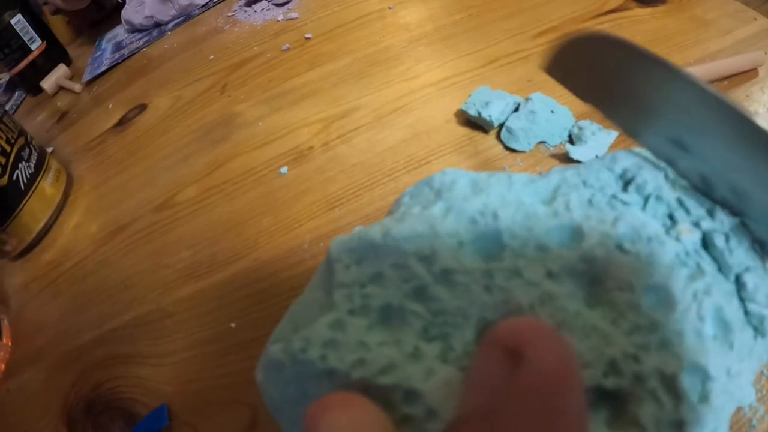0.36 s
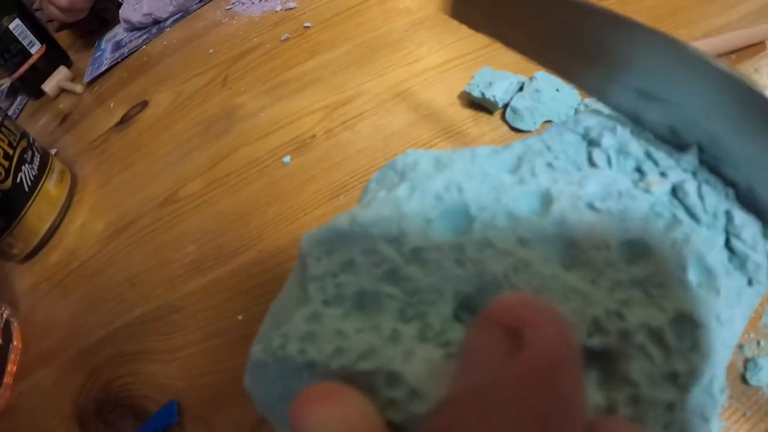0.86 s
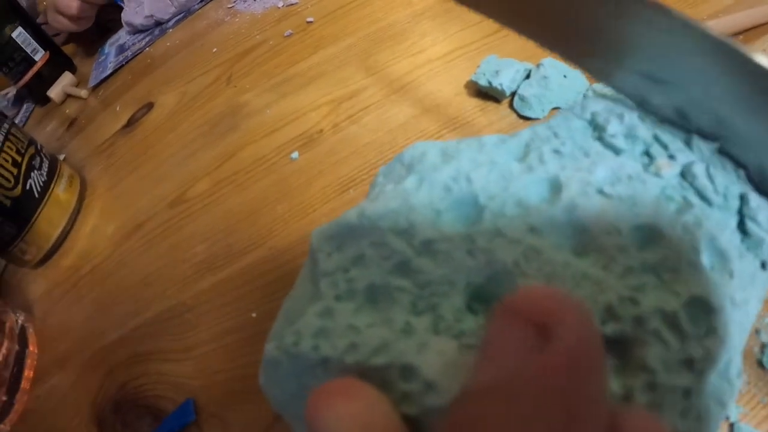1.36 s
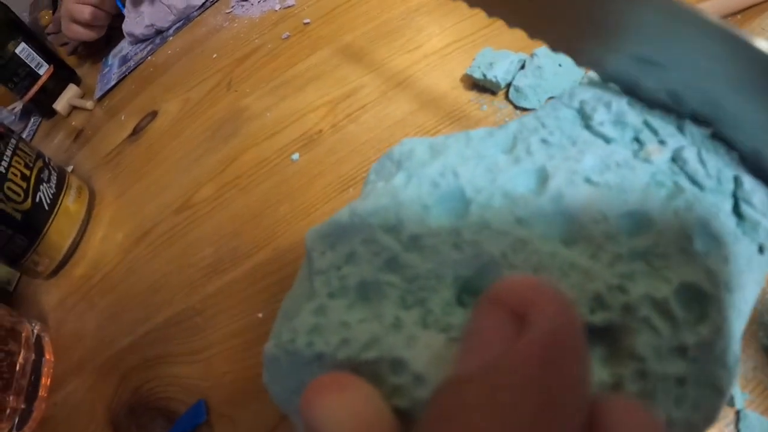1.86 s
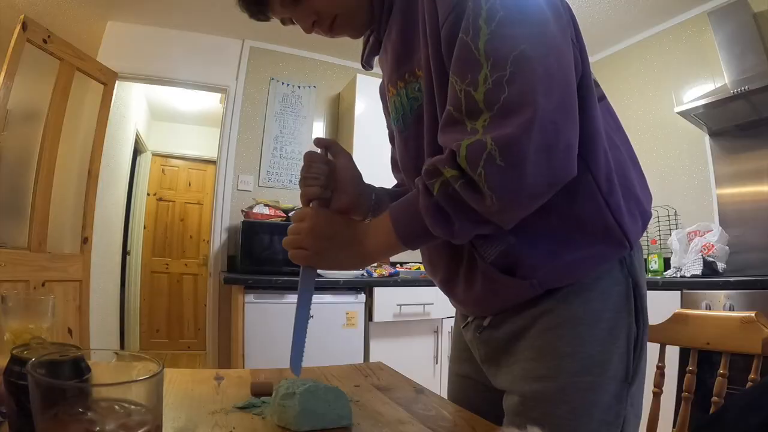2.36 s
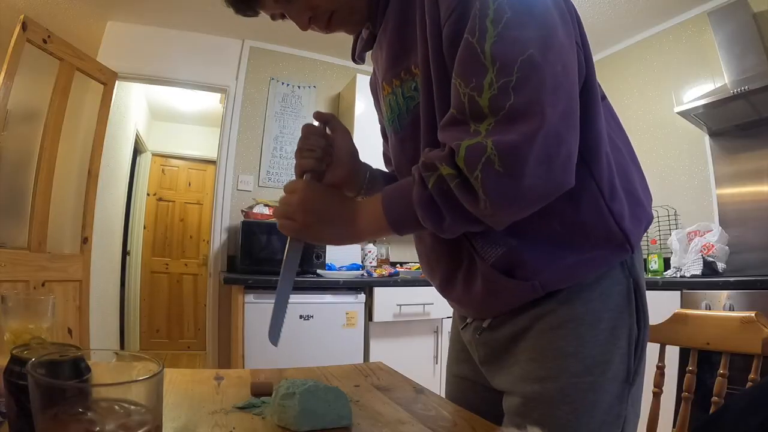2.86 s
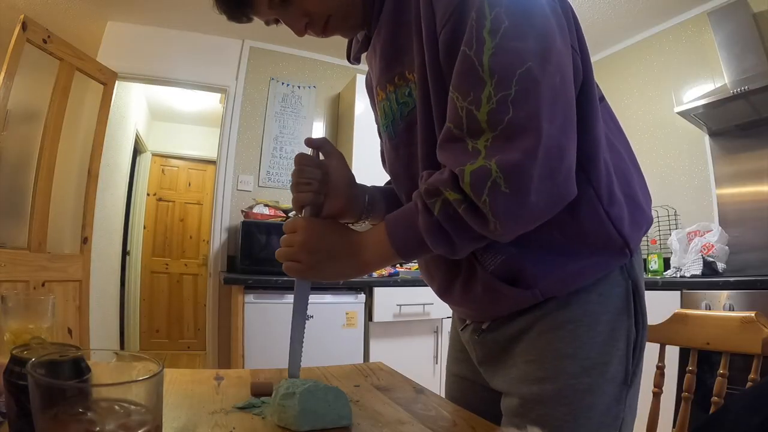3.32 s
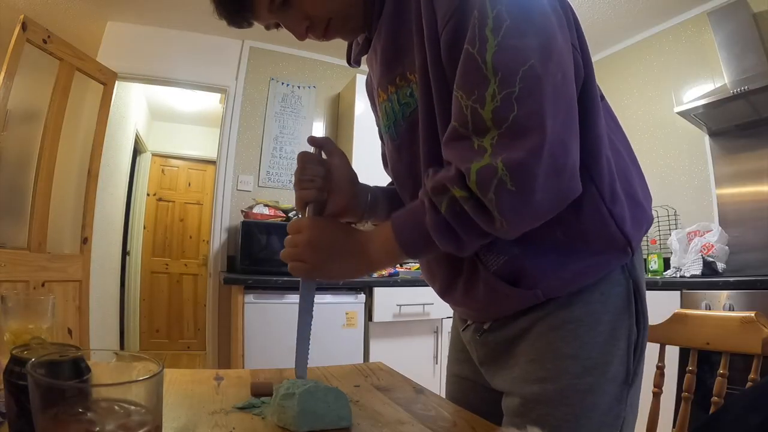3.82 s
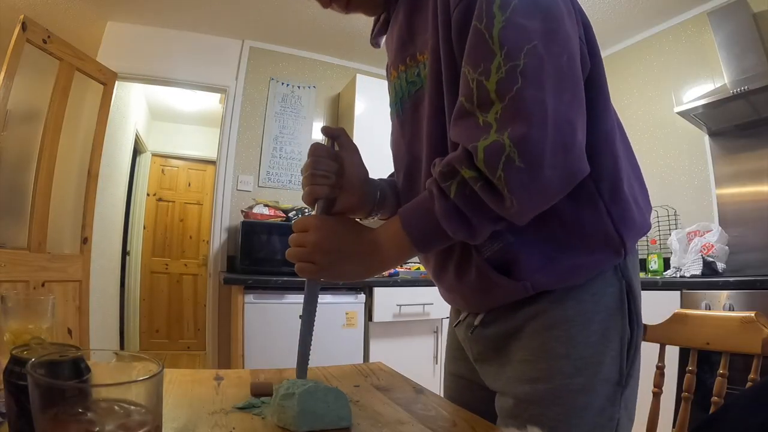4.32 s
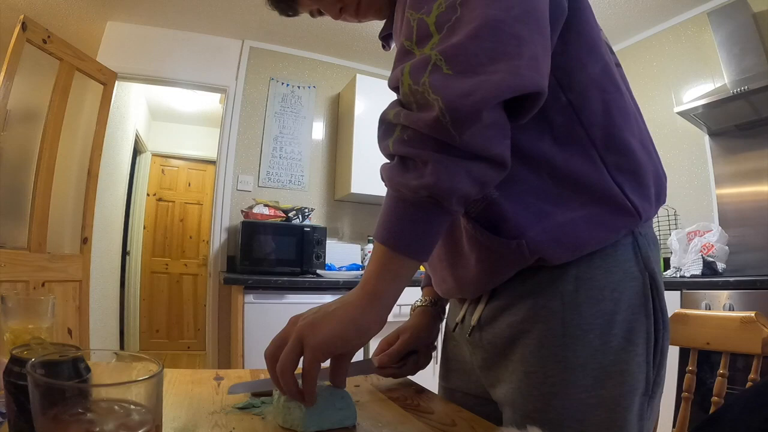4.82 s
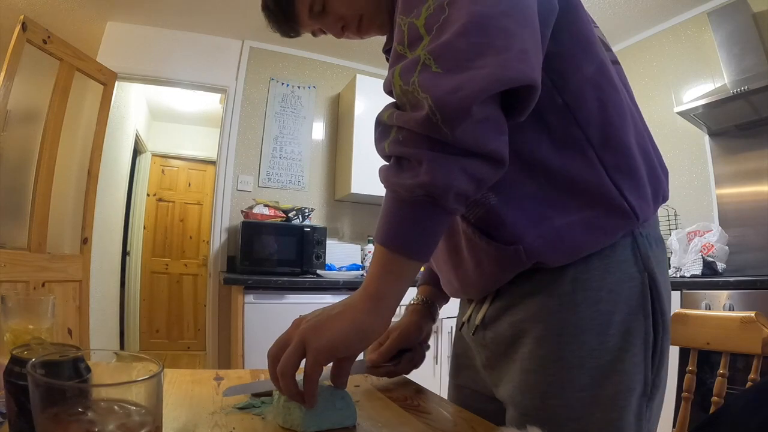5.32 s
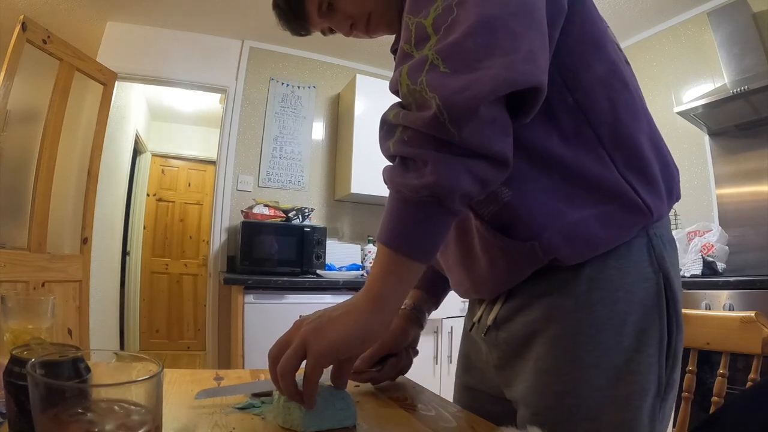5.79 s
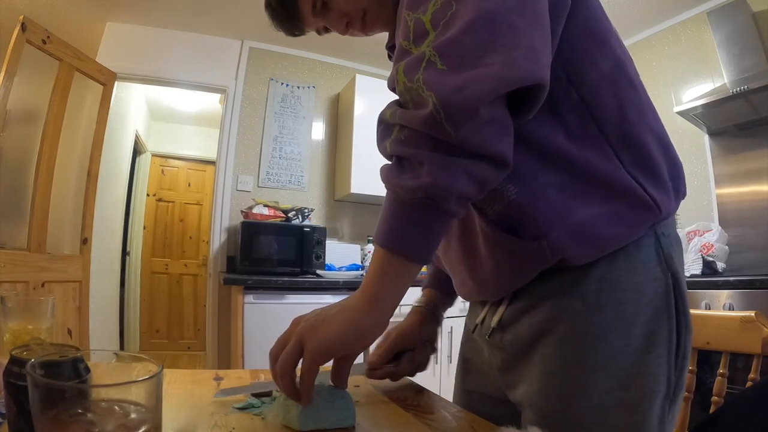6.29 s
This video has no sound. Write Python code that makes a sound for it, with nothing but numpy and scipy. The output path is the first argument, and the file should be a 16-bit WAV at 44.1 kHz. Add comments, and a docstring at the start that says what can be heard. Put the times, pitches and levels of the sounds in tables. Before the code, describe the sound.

Fast, even push-and-pull sawing fills the centre, dry and grainy, the wooden table resonating and the blade ringing faintly. A brittle crack comes just before a sudden cut to a more distant, roomy view. There the knife point knocks into the block three times, with a tiny tooth rattle and low drag between, before small scrapes and renewed light sawing in short strokes.

```python
"""Kitchen table, microphones very close: a serrated knife saws a crumbly block, in the centre.
The teeth make the blade judder and sing; breaking grains excite table, block and blade; the block snaps.
Then at once from across the table, in a small room: crumbs tick and the knife point jabs three times;
between the jabs come a faint blow, a rattle of teeth and a low drag.
Last comes more sawing, left of centre, the room answering."""
import sys
import numpy as np
from scipy import signal
from scipy.fft import rfft, irfft
from scipy.io import wavfile

SR = 44100
rng = np.random.default_rng(int(sys.argv[2]) if len(sys.argv) > 2 else 0)


def to_linear_factor(level_db):
    """Convert decibel levels (scalar or array-like) to linear amplitude factors."""
    exponent = np.asarray(level_db, float) / 20
    return 10 ** exponent


def digitize_waveform(pressure):
    """Quantize a signal to 16-bit integers and store it at the path in sys.argv[1].

    Rows of a 2-D input are taken as channels; values are limited to [-1, 1].
    """
    field = np.atleast_2d(pressure).T
    bounded = np.clip(field, -1, 1)
    quanta = np.round(bounded * 32767).astype(np.int16)
    wavfile.write(sys.argv[1], SR, quanta)


N = 283178
MOVE_S = 2.361   # the listening place jumps from close up to across the table


def rms_one(x):
    """Scale to rms 1."""
    return x / np.sqrt(np.mean(x ** 2) + 1e-20)


def band(x, low_hz, high_hz):
    """Band-pass."""
    return signal.sosfilt(signal.butter(2, [low_hz, high_hz], "band", fs=SR, output="sos"), x + 1e-18)


def colour(x, points):
    """Shape a dense signal to a spectrum."""
    hz, db = np.transpose(points)
    log_hz = np.log(np.fft.rfftfreq(N, 1 / SR) + 1)
    return irfft(rfft(x) * to_linear_factor(np.interp(log_hz, np.log(hz), db)), N)


def ring(clicks, hz, t60):
    """A unit click sets a sine of height 1 ringing; it falls 60 dB in t60 seconds."""
    r = to_linear_factor(-60 / (t60 * SR))
    w = 2 * np.pi * hz / SR
    return signal.lfilter([0, np.sin(w)], [1, -2 * r * np.cos(w), r * r], clicks + 1e-18)


def clicks_at(times, db):
    """Single clicks."""
    out = np.zeros(N)
    out[np.round(np.asarray(times) * SR).astype(int)] = to_linear_factor(np.asarray(db))
    return out


def grains(per_s, spread_db):
    """Breaking grains: random clicks, a few much larger than most."""
    sizes = to_linear_factor(spread_db * np.minimum(rng.exponential(1, N), 5)) * rng.choice([-1, 1], N)
    return sizes * (rng.random(N) < per_s / SR)


def wobble(hz):
    """Slow chance between hz/4 and hz, spread 1."""
    return rms_one(band(rng.standard_normal(N), hz / 4, hz))


USUAL_BLOCK_DB = -35
BLADE_NEAR_DB, BLADE_FAR_DB = -34, -43.5   # blade level in a usual stroke
BLADE_FOLLOWS = 1.36   # dB of blade per dB of block
PUSH_GLIDE, PULL_GLIDE = 0.052, -0.011   # share by which the blade modes glide
CONTACT_HARDEST = 0.35   # share of a short contact at which it presses hardest
# saw strokes, push and pull in turn: start t/s, end t/s, hardest point/0-1, table level/dB, block level/dB
SAW_STROKES = [(-0.06, 0.124, 0.42, -30.5, -36.5), (0.15, 0.34, 0.59, -30, -35.5),
               (0.357, 0.609, 0.87, -33.5, -36), (0.634, 0.811, 0.55, -36, -38.5),
               (0.848, 1.018, 0.82, -33, -34.5), (1.061, 1.237, 0.52, -27, -34),
               (1.281, 1.487, 0.49, -26, -33.5), (1.514, 1.682, 0.88, -30, -34.5),
               (1.722, 1.956, 0.68, -30, -34.5), (1.978, 2.17, 0.35, -29.5, -34),
               (2.181, 2.448, 0.31, -38, -36.5), (4.583, 4.73, 0.56, -34.5, -36),
               (4.773, 4.921, 0.81, -33, -33), (5.365, 5.49, 0.4, -35.5, -39.5),
               (5.519, 5.675, 0.68, -30.5, -33.5), (5.716, 5.899, 0.59, -28, -34),
               (5.939, 6.06, 0.75, -30, -32), (6.092, 6.259, 0.59, -35, -37),
               (6.292, 6.464, 0.51, -42.5, -43.5)]
# short scrapes, crunches and press-ins on the block: start t/s, end t/s, table, block and blade level/dB
CONTACT_RUBS = [(2.062, 2.204, -29.5, -30, -80), (2.637, 2.684, -37, -75, -53),
                (2.932, 3.065, -46, -50.5, -65.5), (3.142, 3.246, -36.5, -44.5, -61.5),
                (3.497, 3.591, -73.5, -87.5, -54.5), (3.726, 3.818, -67, -60.5, -91),
                (3.879, 3.911, -37.5, -52, -75), (4.079, 4.165, -42, -46.5, -73),
                (4.388, 4.444, -37, -41.5, -49), (4.971, 5, -36.5, -40, -52.5),
                (5.039, 5.146, -45.5, -53.5, -58), (5.148, 5.315, -52.5, -60.5, -66.5),
                (5.328, 5.36, -49, -52.5, -64)]


def contacts():
    """All contacts as rows of (start, end, hardest, table dB, block dB, blade dB, glide)."""
    rows = [(start, end, CONTACT_HARDEST, *levels, 0) for start, end, *levels in CONTACT_RUBS]
    for k, (start, end, hardest, table_db, block_db) in enumerate(SAW_STROKES):
        close = start < MOVE_S
        usual_db = BLADE_NEAR_DB if close else BLADE_FAR_DB
        blade_db = usual_db + BLADE_FOLLOWS * (block_db - USUAL_BLOCK_DB)
        glide = PULL_GLIDE if k % 2 else PUSH_GLIDE
        # across the table the blade's pitch stays steady through each stroke
        rows.append((start, end, hardest, table_db, block_db, blade_db, glide * close))
    return rows


LINGER_S = 0.029   # crumbs keep sliding after the blade stops


def strokes(rows):
    """Gains of table, block and blade, swelling to the hardest point, and the blade's glide."""
    t, gains, glide = np.arange(N) / SR, np.zeros((3, N)), np.zeros(N)
    for start, end, peak, table_db, block_db, blade_db, slide in rows:
        span = slice(max(round(start * SR), 0), round(end * SR))
        along = (t[span] - start) / (end - start)
        swell = np.sin(np.pi / 2 * np.interp(along, [0, np.clip(peak, .1, .9), 1], [0, 1, 0]))
        levels = to_linear_factor(np.array([[table_db], [block_db], [blade_db]]))
        gains[:, span] += levels * swell ** np.array([[1.4], [1.15], [.9]])
        glide[span] = slide * (2 * along - 1)
    linger = np.exp(-1 / (LINGER_S * SR))
    sliding = 1.07 * signal.lfilter([1 - linger], [1, -linger], gains)
    return np.maximum(gains, sliding), glide


CATCH_S = 0.14   # how long the teeth hold on
# moments when the teeth catch: middle t/s, tooth rate f/Hz, buzz level/dB, usual octave level/dB
TEETH_CATCH = [(0.268, 70, -25, -36.5), (0.728, 104, -31, -49), (0.964, 94, -52, -32),
               (1.178, 72.6, -27, -33.5), (1.433, 71, -32, -31), (1.626, 84, -30, -61),
               (1.86, 132, -29.5, -50.5), (2.086, 76, -25.5, -42), (5.848, 65.6, -37, -35),
               (6.045, 72, -36, -38.5), (6.314, 32.5, -34.5, -43)]


def judder():
    """Phase of the passing teeth, how firmly they catch (0-1), and the low buzz of the blade."""
    t, rows = np.arange(N) / SR, np.array(TEETH_CATCH)
    nearest = np.searchsorted((rows[1:, 0] + rows[:-1, 0]) / 2, t)
    middle, teeth_hz, buzz_db, octave_db = rows[nearest].T
    catch = np.cos(np.pi * np.clip((t - middle) / CATCH_S, -.5, .5))
    phase = 2 * np.pi * np.cumsum(teeth_hz * (1 + 0.051 * wobble(38))) / SR
    octave = np.cos(2 * phase + 1.0) + 0.36 * np.cos(4 * phase)
    waves = to_linear_factor(buzz_db) * np.cos(phase) + to_linear_factor(octave_db + 6.9 * wobble(25)) * octave
    return phase, catch, np.sqrt(2) * catch * waves


# modes of the table top, lowest first: f/Hz, level/dB, free t60/s
TABLE_MODES = [(40.3, 4.5, 0.21), (143.7, -2.5, 0.14), (193.5, -13, 0.6), (241.2, -7.5, 0.22),
               (339, -11.5, 0.1), (414, -2.5, 0.18), (518, -13, 0.19), (591, -5.5, 0.15), (781.4, -5, 0.14),
               (959, -10.5, 0.18), (1340, -7.5, 0.053), (1601, -11, 0.098), (2010, -8, 0.026)]


def table(clicks, modes, damping):
    """The table top's modes in alternating sign; damping scales their ring, as a pressing hand does."""
    return sum(to_linear_factor(db) * ring(clicks, hz, t60 * damping) * (-1) ** k
               for k, (hz, db, t60) in enumerate(modes))


# modes of the blade at rest: f/Hz, half-width f/Hz, lift level/dB
BLADE_MODES = [(3656, 136, 8.5), (4766, 256, 9), (5900, 860, 4), (7460, 140, 2.5), (12300, 1100, 7.5)]


def blade(grit, glide, cycles, patchy_db):
    """Each grain pings softly at its own pitch, louder near the blade modes; pitch patches come and go."""
    pitches, dealt, out = np.geomspace(2300, 14800, 36), rng.integers(0, 36, N), 0
    step = 1100   # samples between settings of the lift
    coarse_glide = glide[::step]
    patches = rng.standard_normal((36, len(coarse_glide)))
    for k, hz in enumerate(pitches):
        lift_db = patchy_db * patches[k]
        for mode_hz, width, db in BLADE_MODES:
            lift_db = lift_db + db / (1 + ((hz - mode_hz * (1 + coarse_glide)) / width) ** 2)
        gain = np.interp(np.arange(N), np.arange(0, N, step), to_linear_factor(lift_db))
        # a second, shorter ring softens the onset
        pings = ring(ring(grit * (dealt == k), hz, cycles / hz), hz, 5.28 / hz)
        out = out + gain * rms_one(pings) * np.sqrt(hz)
    return out


def sawing(phase, bite, gains, steel, spectrum):
    """Grains break in bunches, one bunch per tooth; bite is how firmly the teeth catch."""
    bunch = 1 + np.clip(bite, 0, .9) * np.cos(phase)
    lumps = grains(900, 3.26) * bunch ** 2
    wood = sum(to_linear_factor(2.97 * wobble(6)) * table(lumps, [mode], 0.3) for mode in TABLE_MODES[2:9])
    wood = wood + 0.29 * colour(lumps, spectrum)
    crunch = grains(3000, 2.25) * bunch * to_linear_factor(1.5 * wobble(30))
    block = 0.31 * table(crunch, TABLE_MODES[8:], 0.14) + 1.4 * colour(crunch, spectrum)
    out = gains[0] * rms_one(band(wood, 227, 604))
    out += gains[1] * rms_one(band(band(block, 812, 3900), 400, 2900))
    return out + gains[2] * bunch ** 0.32 * rms_one(colour(steel, spectrum))


# spectrum of the sawing very close to the microphones: f/Hz, level/dB per Hz
NEAR_SPECTRUM = [(290, -21.5), (500, 18.5), (823, 9.5), (2610, -21.5), (4800, -25.5), (8610, -29.5),
                 (9930, -46.5), (12800, -50.5), (15000, -50)]


def near(phase, catch, gains, steel):
    """Close sawing in the centre; the table rocks, the finest dust fizzes on the right."""
    mid = sawing(phase, .5 * catch, gains, steel, NEAR_SPECTRUM)
    mid += (0.43 * gains[0] + to_linear_factor(-44.0)) * rms_one(band(rng.standard_normal(N), 30, 202))
    # the steel reversed in time, so that the fizz does not follow it
    fizz = to_linear_factor(-23.0) * gains[2] * rms_one(band(steel[::-1], 11600, 14600))
    return np.array([mid, mid + fizz])


SING_S, SING_WAVER_HZ = 0.091, 153   # length of a sung line, top rate of its wavering
# moments when the blade sings: middle t/s, f/Hz, glide f/Hz per s, level/dB
SUNG_LINES = [(0.03, 4900, -3000, -43.5), (0.27, 5970, 8000, -45.5), (0.58, 4850, 0, -44.5),
              (0.96, 4960, 3000, -40.5), (0.98, 3830, 6000, -40), (1.15, 5600, 12000, -45.5),
              (1.411, 5000, 0, -38), (1.44, 3780, 4000, -42), (2.32, 3880, 499, -41.5),
              (3.535, 4450, 0, -57), (4.85, 4900, 5000, -46), (5.631, 3600, 1000, -48.5)]


def singing():
    """Broad wavering lines of the blade that swell and glide."""
    out, age = np.zeros(N), np.arange(-SING_S / 2, SING_S / 2, 1 / SR)
    for s, hz, glide, db in SUNG_LINES:
        at = np.round((s + age) * SR).astype(int)
        swell = to_linear_factor(db) * np.cos(np.pi * age / SING_S)
        line = swell * np.cos(2 * np.pi * (hz + glide * age / 2) * age)
        out[at[at >= 0]] += line[at >= 0]
    return np.sqrt(2) * wobble(SING_WAVER_HZ) * out


# snaps and dull knocks in the block: t/s, level/dB of the click into the table
BLOCK_SNAPS = [(1.642, -17), (2.011, -21), (2.067, -10), (2.113, -5), (3.049, -35.5), (3.167, -22),
               (5.624, -20), (5.646, -21), (5.778, -20)]


def snaps():
    """Snaps and knocks go dully into the table, with a weaker bright edge."""
    clicks = clicks_at(*np.transpose(BLOCK_SNAPS))
    dull = band(table(clicks, TABLE_MODES[4:], 0.19), 200, 3000)
    return dull + to_linear_factor(-10) * band(table(clicks, TABLE_MODES[8:], 0.11), 700, 3200)


# background of the kitchen: f/Hz, level/dB per Hz (shape only)
ROOM_SPECTRUM = [(25, 2.5), (55, 2.5), (95, -18), (200, -5), (450, -16.5), (900, -24), (2400, -34.5),
                 (7500, -42), (11000, -59.5), (16000, -64)]


def room_tone():
    """Steady shaped noise, mostly shared by the two microphones, partly opposed."""
    shared, side = [to_linear_factor(-56) * rms_one(colour(w, ROOM_SPECTRUM)) for w in rng.standard_normal((2, N))]
    return shared + 0.48 * side * np.array([[1], [-1]])


def hiss():
    """A faint hiss that fades after the move."""
    fade = np.exp(-np.maximum(np.arange(N) / SR - MOVE_S, 0) / 0.47)
    return to_linear_factor(-61.5) * fade * rms_one(band(rng.standard_normal((2, N)), 1100, 5500))


KITCHEN_T60_S = 0.34   # below 2500 Hz; the treble dies faster


def kitchen(x):
    """Early echoes and a tail that loses treble: dying noise, another one per microphone."""
    t = np.arange(int(.5 * SR)) / SR
    shared, own = rng.standard_normal((2, len(t))) * (t > .004)
    noise = shared + 0.52 * own * np.array([[1], [-1]])
    low = band(noise, 170, 2500) * to_linear_factor(-60 * t / KITCHEN_T60_S)
    high = band(noise, 2500, 14000) * to_linear_factor(-80 * t / KITCHEN_T60_S)
    tail = low + high
    tail = tail / np.sqrt(np.sum(tail ** 2, axis=1, keepdims=True))
    return signal.fftconvolve(x[None], tail, axes=1)[:, :N]


# spectrum of the knife work from across the table: f/Hz, level/dB per Hz
FAR_SPECTRUM = [(290, -37), (859, 8), (1350, 9.5), (3230, -17.5), (4670, -18.5), (7790, -22),
                (15000, -47.5)]
# ranges that sound weak across the table: low f/Hz, high f/Hz, share lost/0-1
WEAK_RANGES = [(520, 1097, 0.27), (2150, 2900, 0.42)]


def far(phase, catch, gains, steel, small):
    """Across the table: the block sits left of centre, the room answers."""
    cut = sawing(phase, 0.055 + 0.19 * catch, gains, steel, FAR_SPECTRUM)
    rocking = to_linear_factor(-6.5) * gains[0] * rms_one(table(grains(600, 3.8), TABLE_MODES[:2], 0.73))
    dry = (cut + rocking + jabs(steel) + small) * (np.arange(N) >= MOVE_S * SR)
    for low_hz, high_hz, share in WEAK_RANGES:
        dry = dry - share * band(dry, low_hz, high_hz)
    lean = (to_linear_factor(3) - 1) * band(dry, 1520 / 3.04, 1520 * 3.44)   # left 3 dB up, right down
    lean += 5.4 * np.gradient(band(dry, 2190, 2330))   # the right ear hears this range a little late
    lean += 10.0 * np.gradient(band(dry, 30, 220))   # the table shakes the two sides unequally
    echoes = 2.6 * to_linear_factor(-18) * kitchen(dry)
    return np.array([dry + lean, dry - lean]) + echoes + room_tone() + hiss()


def spit_and_knock(bright, dull):
    """Bright clicks spit a 2 ms noise burst; dull ones give a short knock."""
    spit = signal.lfilter([1], [1, -np.exp(-1 / (0.002 * SR))], bright)
    knock = band(ring(dull, 1480, 0.011), 500, 2000) * to_linear_factor(17.0)
    return band(spit * rng.standard_normal(N), 2800, 8600) + knock


# crumbs and blade ticking: t/s, bright level/dB into the spit, dull level/dB into the knock
CRUMB_TICKS = [(2.4927, -39.5, -52), (2.6438, -41, -57.5), (2.7412, -42, -66), (4.393, -56, -54.5),
               (5.015, -56, -54), (5.057, -51, -57), (5.094, -55, -52), (5.2107, -46.5, -49),
               (5.3305, -44, -44)]


def ticks():
    """A tick is a brief bright spit with a short knock."""
    s, bright_db, dull_db = np.transpose(CRUMB_TICKS)
    return spit_and_knock(clicks_at(s, bright_db), clicks_at(s, dull_db))


# point blows: t/s, block level/dB, block f/Hz, thud level/dB, crack level/dB, plank level/dB
# (levels of the clicks that set things ringing)
POINT_JABS = [(2.497, -8.5, 377, -21, -22, -18), (2.669, -26, 407, -52, -49.5, -32),
              (3.174, -7, 235, -13, -9, -19), (3.895, -5.5, 371, -12, -13.5, -26)]
# the upright blade rings at: f/Hz
UPRIGHT_BLADE_HZ = [4540, 5470, 7030]


def jabs(steel):
    """The point cracks in, block, table and blade ring, the legs thud, crumbs slide after."""
    t = np.arange(N) / SR
    crumbs = rms_one(band(grains(4000, 2.3), 520, 1500))
    dust = rms_one(colour(grains(8300, 2.6), FAR_SPECTRUM))
    dust = rms_one(band(dust, 2800, 9000))
    dust += rms_one(colour(steel, FAR_SPECTRUM))
    dust += 0.62 * rms_one(sum(ring(dust, hz, 0.036) for hz in UPRIGHT_BLADE_HZ))
    s, block_db, block_hz, thud_db, crack_db, plank_db = np.transpose(POINT_JABS)
    blow = sum(ring(clicks_at([at + 0.00365], db), hz, 0.036) for at, db, hz in zip(s, block_db, block_hz))
    plank_hz, _, plank_t60 = TABLE_MODES[3]
    blow += ring(clicks_at(s + 0.00493, plank_db), plank_hz, plank_t60)
    blow += table(clicks_at(s + 0.0052, thud_db), TABLE_MODES[:2], 0.8)
    blow += table(clicks_at(s + 0.00404, block_db - 14), TABLE_MODES[2:], 0.62)
    blow += table(clicks_at(s + 0.0009, crack_db + 9), TABLE_MODES[9:12], 0.2)   # the crack's edge
    out = band(band(blow, 33, 1500), 15, 2200)   # the crumbly block softens the contact
    for at, db in zip(s, crack_db):
        age = np.maximum(t - at, 0)
        out += to_linear_factor(db - 16.5) * (t > at) * np.exp(-age / 0.021) * crumbs
        slide = np.exp(-age / 0.053) + 2.3 * np.exp(-age / 0.0047)
        out += to_linear_factor(db - 35.5) * (t > at) * slide * dust
    return out


def rattle():
    """Teeth dragged out of the cut: five even spits and knocks, 9.8 ms apart."""
    teeth = clicks_at(2.972 + .0098 * np.arange(5), -50)
    return spit_and_knock(2 * teeth, teeth)


DRAG_START_S, DRAG_END_S, DRAG_DB = 3.453, 3.58, -45


def drag():
    """The block drags on the plank as the point pulls free: a low rub that starts at once."""
    t = np.arange(N) / SR
    rub = grains(2500, 1.7) * (t > DRAG_START_S) * (t < DRAG_END_S)
    rub = band(table(rub, TABLE_MODES[3:6], 0.25), 134, 390)
    # the root makes the level hold for the rub's own length
    return to_linear_factor(DRAG_DB) * rms_one(rub) * np.sqrt((DRAG_END_S - DRAG_START_S) * SR / N)


def scene():
    """Close view first, cut off in mid-stroke, then the wide one."""
    phase, catch, buzz = judder()
    close_gains, glide = strokes([row for row in contacts() if row[0] < MOVE_S])
    far_gains, far_glide = strokes([row for row in contacts() if row[0] > MOVE_S])
    grit = grains(16000, 1.5) * to_linear_factor(0.92 * wobble(44))
    steel = rms_one(blade(grit, glide + far_glide, cycles=80.0, patchy_db=5.0))
    small = buzz + singing() + snaps() + ticks() + rattle() + drag()
    close = near(phase, catch, close_gains, steel) + small
    wide = far(phase, catch, far_gains, steel, small)
    return np.where(np.arange(N) < MOVE_S * SR, close, wide)


def top_cut(x):
    """Nothing passes above the cut-off."""
    return signal.sosfilt(signal.butter(12, 15570, fs=SR, output="sos"), x)


def record(dry):
    """The two microphones' finished mix, left and right."""
    return top_cut(dry)


dry = scene()
out = record(dry)
digitize_waveform(out)
```